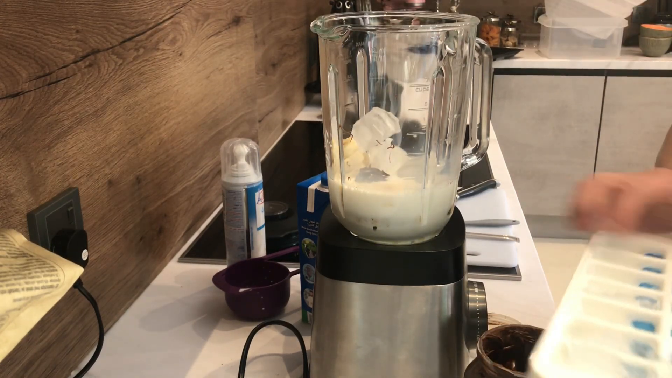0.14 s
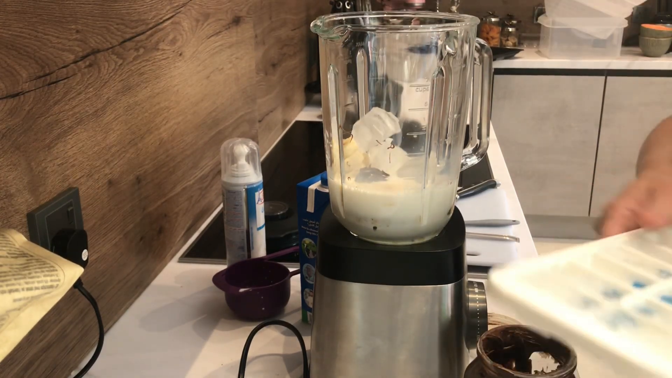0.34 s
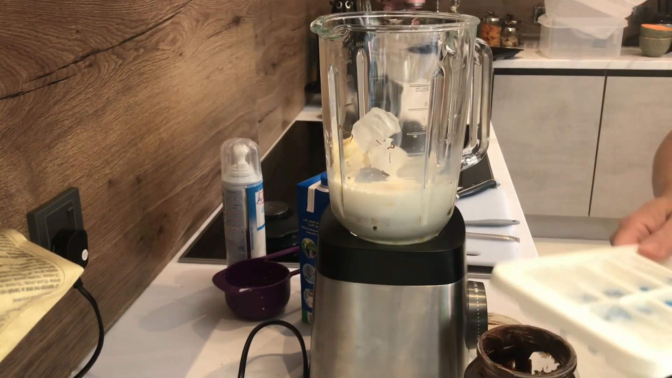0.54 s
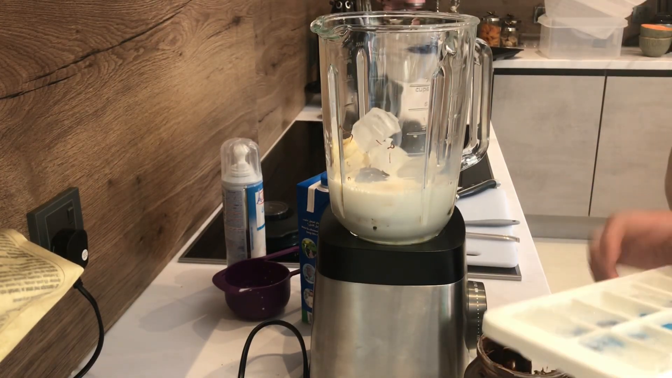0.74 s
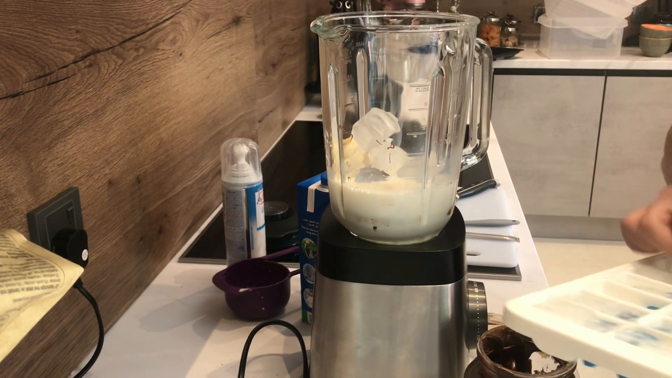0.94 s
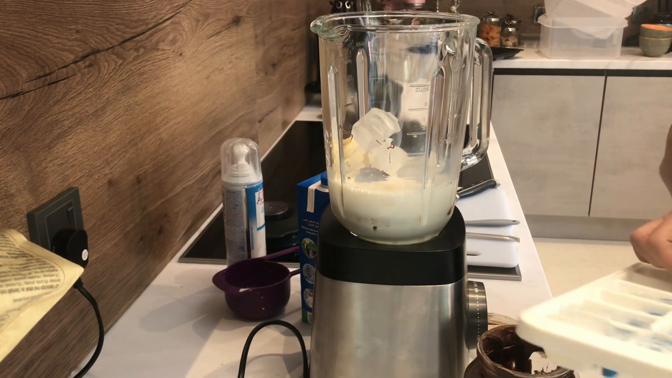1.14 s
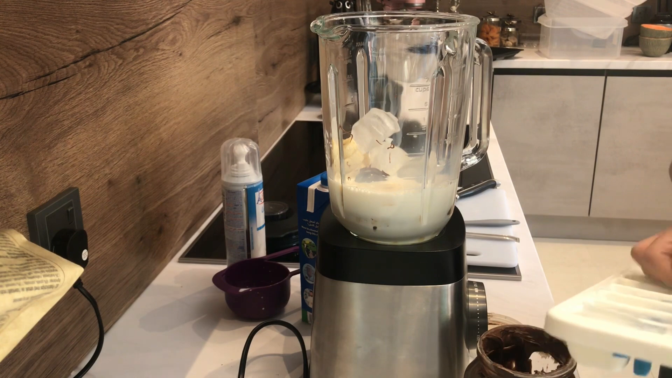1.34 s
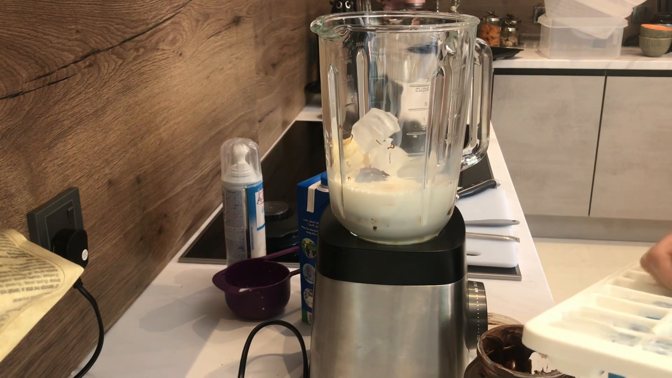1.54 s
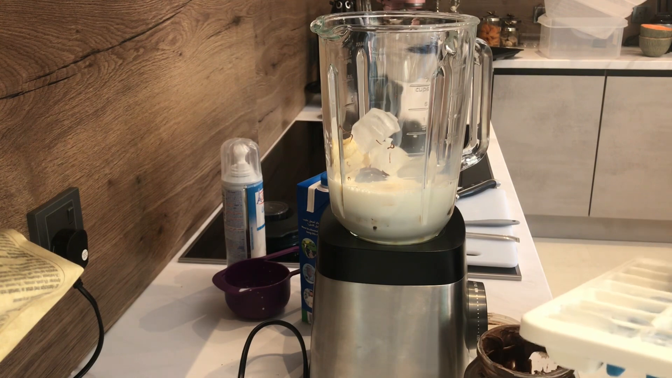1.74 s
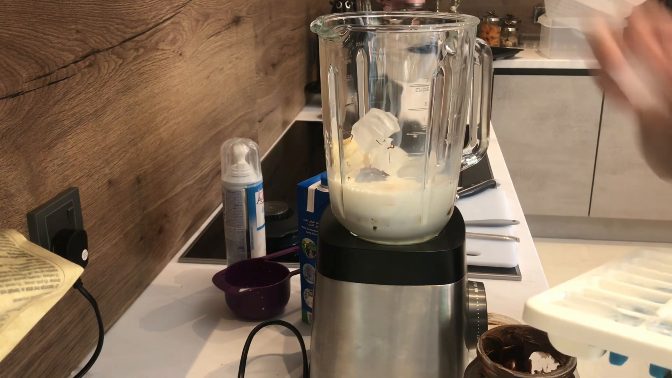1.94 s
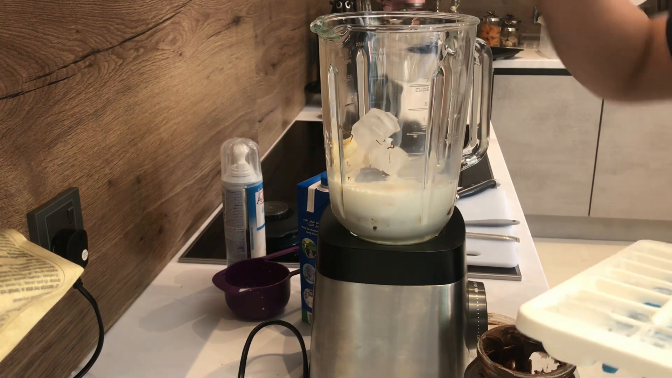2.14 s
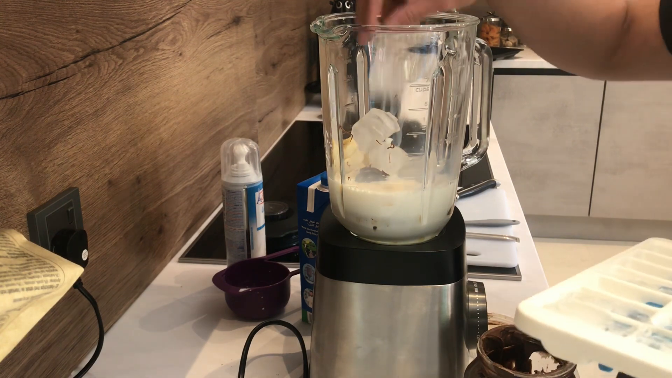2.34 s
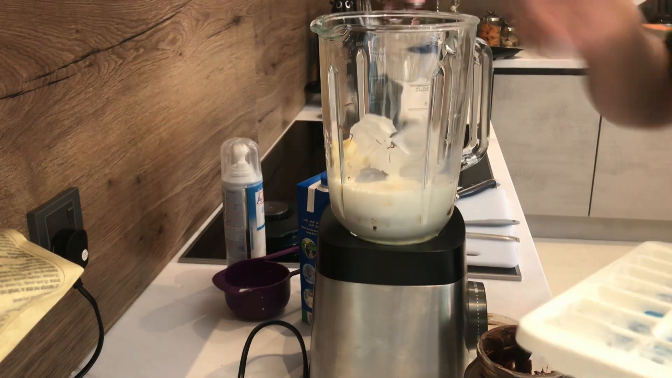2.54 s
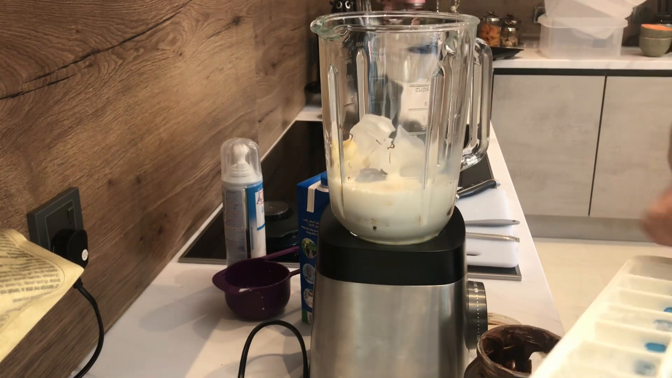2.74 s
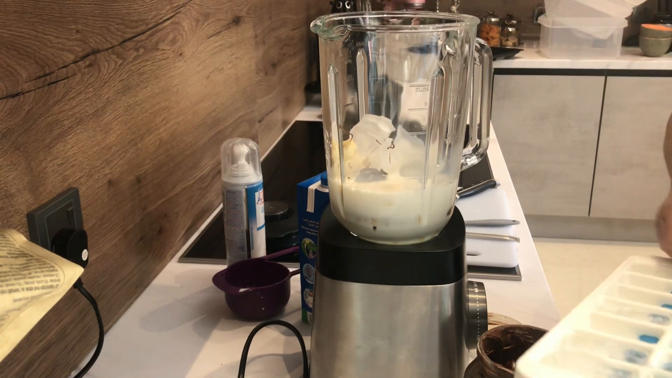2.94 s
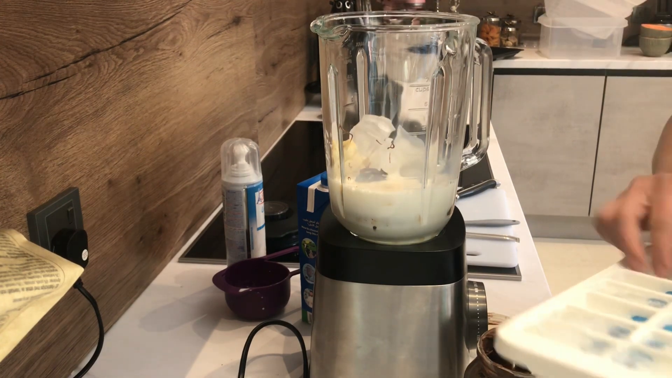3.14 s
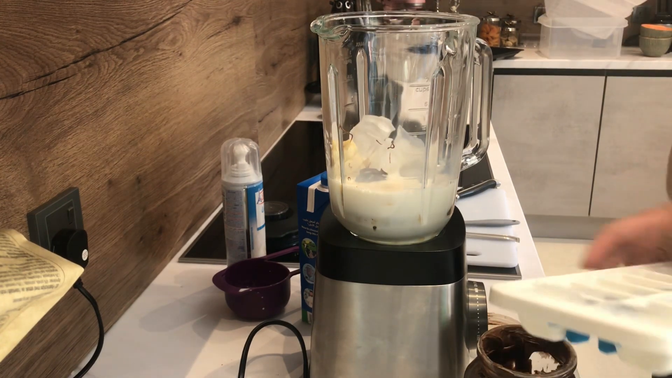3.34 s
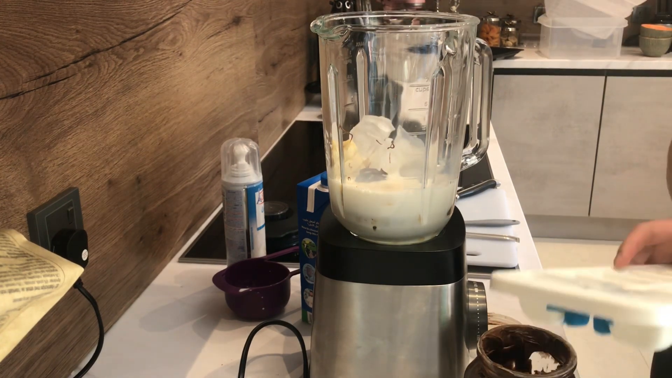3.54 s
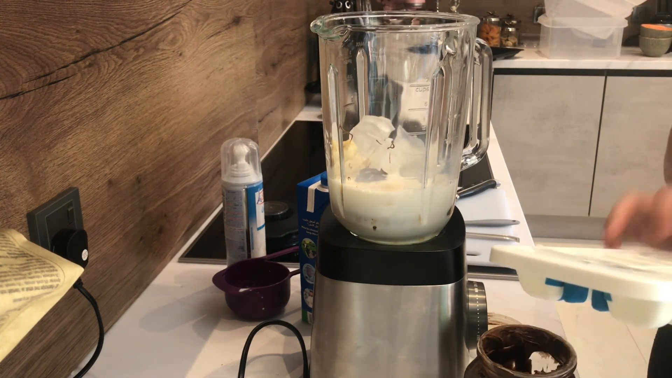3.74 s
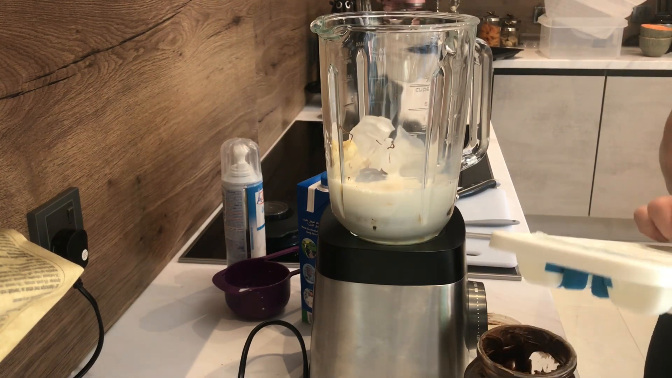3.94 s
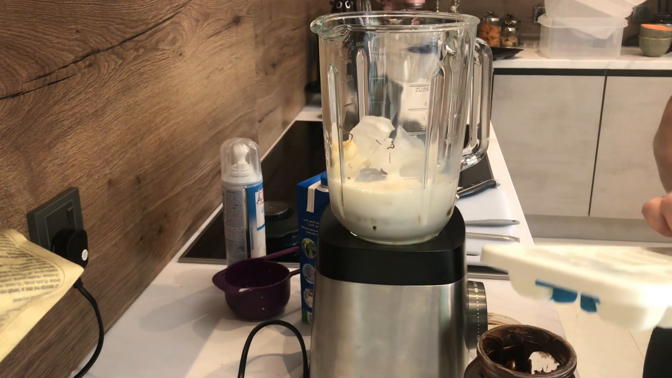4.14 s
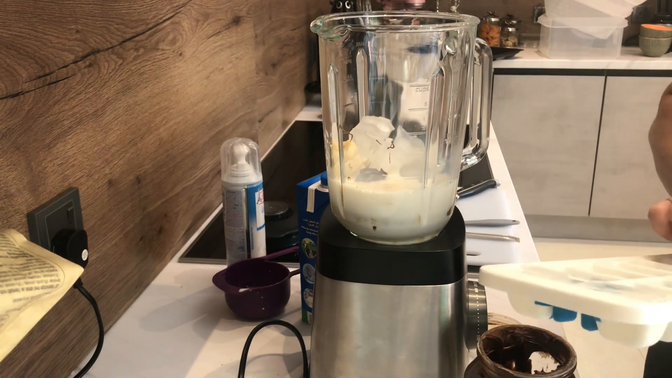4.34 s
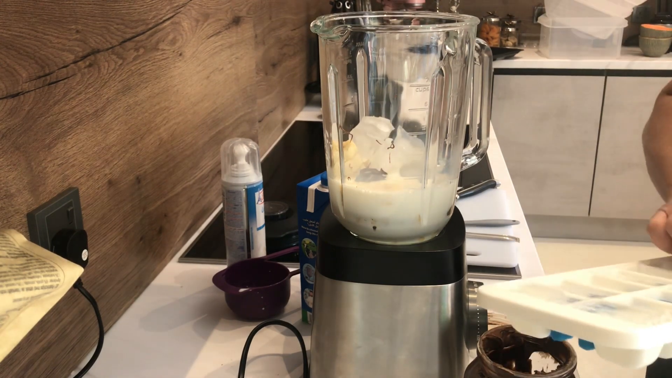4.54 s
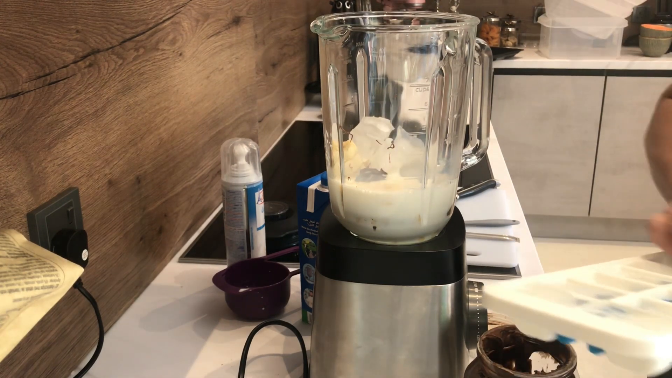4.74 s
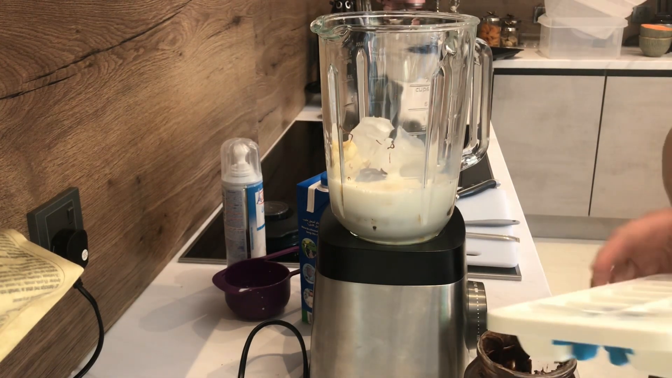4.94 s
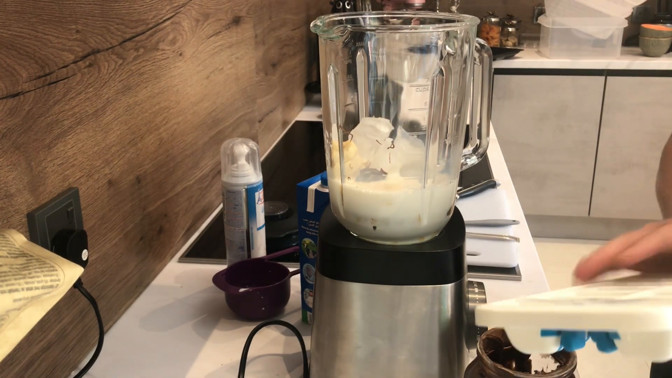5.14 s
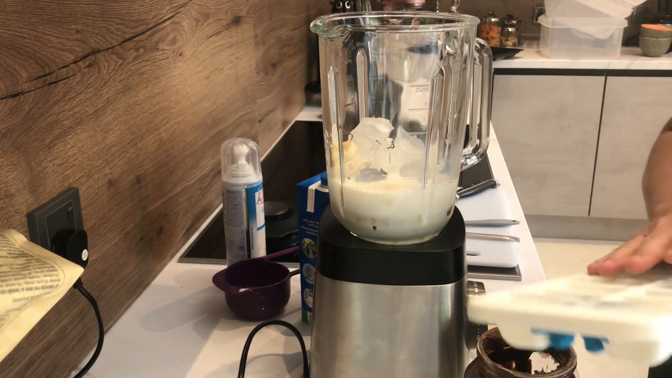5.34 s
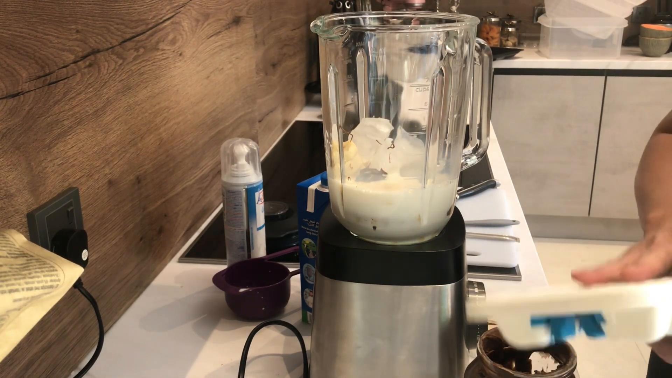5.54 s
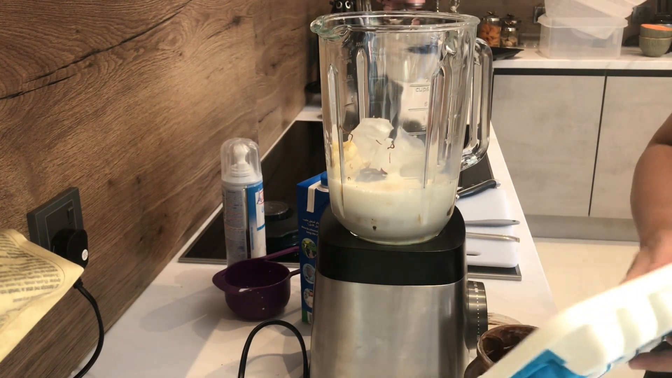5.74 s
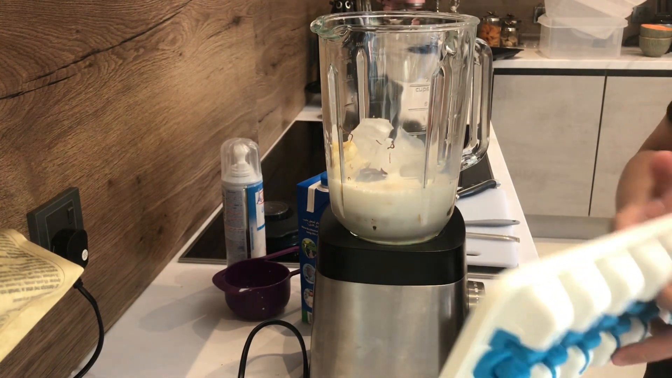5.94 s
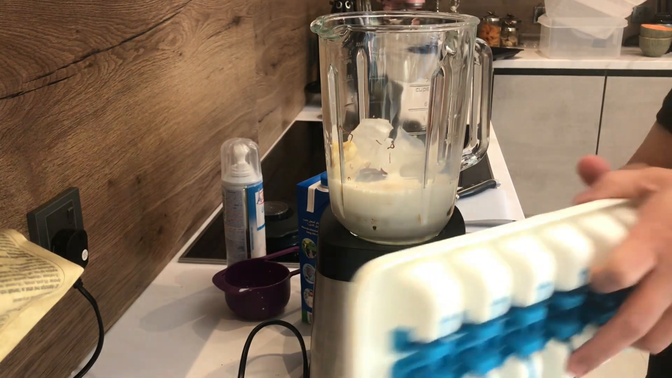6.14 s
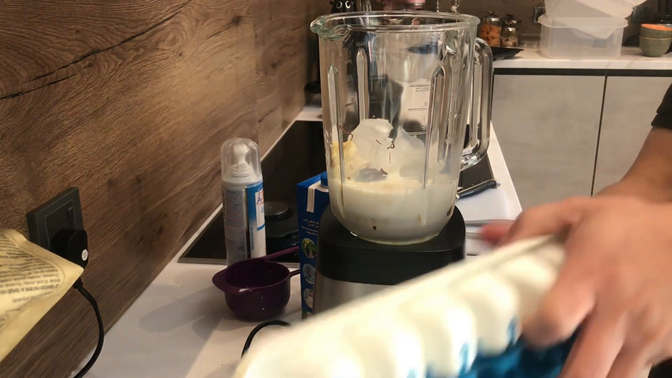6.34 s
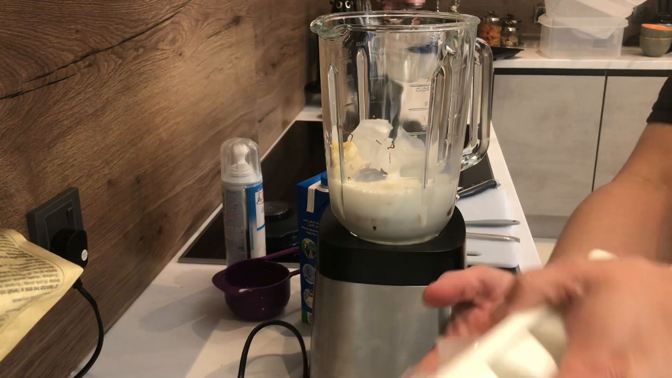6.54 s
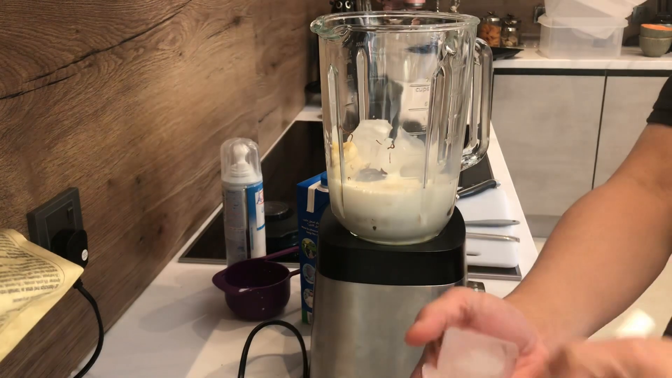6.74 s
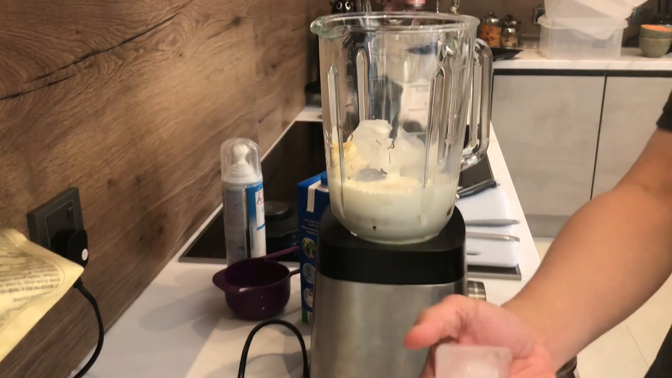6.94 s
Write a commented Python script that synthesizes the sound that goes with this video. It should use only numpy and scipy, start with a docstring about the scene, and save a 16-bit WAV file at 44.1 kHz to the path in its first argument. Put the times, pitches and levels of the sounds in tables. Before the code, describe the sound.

A close phone microphone catches brittle ice snapping in a plastic tray, with faint gritty finger rubs. After some quiet ticks, a few cubes rattle into a heavy glass jar, ringing briefly. More snaps follow, then a lull, then dense, hollow plastic cracks and dull gripping thumps, loudest at the end. A steady soft low hum and short echoes from hard kitchen surfaces lie behind.

```python
"""In a small kitchen, hands twist a plastic ice tray: noise bursts ring resonances of ice, cups and tray body.
Fingers rub the plastic, and later the tray rattles, in strokes of gritty filtered noise. From 2.3 s cubes drop
into a thick glass jar and bounce, ringing its decaying sine modes. Cracking resumes and grows loudest near the
end, with two low, dull thumps as the hand grips the tray. Shaped-noise appliance hum runs throughout; noise
echoes answer from hard walls."""
import sys
import numpy as np
from scipy import signal
from scipy.fft import rfft, irfft, next_fast_len
from scipy.io import wavfile
from scipy.ndimage import uniform_filter1d

SR = 44100
rng = np.random.default_rng(int(sys.argv[2]) if len(sys.argv) > 2 else 0)


def voltage_ratio(decibels):
    """Convert decibels (scalar or array-like) to amplitude ratios, 20 dB per decade."""
    exponent = np.asarray(decibels, float) / 20
    return 10 ** exponent


def unload_audio(sound):
    """Save the sound as a 16-bit wav file, at the path given as the first command line argument."""
    columns = np.transpose(np.atleast_2d(sound))
    # keep every value between -1 and 1, then stretch to whole-number steps
    steps = np.round(np.clip(columns, -1, 1) * 32767)
    wavfile.write(sys.argv[1], SR, steps.astype(np.int16))


N = 312751


def unit(x):
    """Scaled to rms 1."""
    return x / np.sqrt(np.mean(x ** 2) + 1e-20)


def tops(rows):
    """Each row scaled to peak 1."""
    return rows / (np.abs(rows).max(axis=-1, keepdims=True) + 1e-20)


def along(points, hz):
    """(f/Hz, value) points interpolated on a log frequency axis."""
    f, v = np.transpose(points)
    return np.interp(np.log(hz + 1), np.log(f + 1), v)


def filtered(x, response):
    """x filtered by a complex response of frequency."""
    m = next_fast_len(x.shape[-1] + 4096)
    return irfft(rfft(x, m) * response(np.fft.rfftfreq(m, 1 / SR)), m)[..., :x.shape[-1]]


def body(modes):
    """Causal response of resonances (f/Hz, width/Hz, level/dB), summed with alternating sign."""
    def response(f):
        total = 0
        for k, (centre_hz, width_hz, db) in enumerate(modes):
            damped = 1j * f * width_hz
            total = total + (-1) ** k * voltage_ratio(db) * damped / (centre_hz ** 2 - f * f + damped)
        return total
    return response


def rush(spectrum, patchy_db):
    """Coloured noise of rms 1 with time-frequency patches of random gain."""
    z = signal.stft(rng.standard_normal(N), nperseg=512)[2]
    field = uniform_filter1d(rng.standard_normal(z.shape), size=6, axis=0)
    field = uniform_filter1d(field, size=10, axis=1)
    noise = signal.istft(z * voltage_ratio(patchy_db * unit(field)), nperseg=512)[1][:N]
    return unit(filtered(noise, lambda hz: voltage_ratio(along(spectrum, hz))))


def placed(times, rows):
    """Each row of sound laid at its time."""
    at = np.round(times * SR).astype(int)[:, None] + np.arange(rows.shape[1])
    return np.bincount(at.ravel(), rows.ravel(), N + rows.shape[1] + 1)[:N]


def tray():
    """Every crack shakes the cups, and the whole tray as far as the grip allows."""
    # cracks and knocks of ice: t/s, level/dB, cube ring f/Hz, snap/dB
    cracks = [(0.0044, -26, 1200, -6), (0.0098, -25.5, 1900, -13), (0.026, -31, 5630, -1),
              (0.0379, -18.5, 1750, -14), (0.3069, -35, 4160, -8.5), (0.412, -34.5, 1850, -12),
              (0.462, -27, 2210, -33), (0.4685, -21, 2130, -17.5), (0.4786, -25.5, 2200, -28),
              (0.5623, -36, 1850, -9), (1.046, -19.5, 1920, -6.5), (1.2678, -36, 1790, -4),
              (1.2775, -39, 5870, 13), (1.289, -29, 5860, 2.5), (1.3067, -26, 1750, 1),
              (1.3131, -24.5, 1840, -7), (1.327, -21, 1710, -17), (1.4242, -31, 1960, 2),
              (1.4665, -39, 1900, 3), (1.495, -40, 5770, 1), (1.631, -42.5, 1770, -17),
              (1.654, -36.5, 1650, -5), (2.772, -20.5, 1655, -30), (2.7797, -19, 1530, -13),
              (2.7947, -18, 1760, -11), (2.841, -19.5, 1790, -34), (2.9383, -32, 3860, -13),
              (2.9441, -29.5, 2050, -6), (3.0744, -9, 6400, -23), (3.1075, -14, 3800, -5.5),
              (3.1294, -13, 5070, -23), (3.1342, -21, 5340, -3), (3.1754, -17, 2650, -15),
              (3.1932, -15.5, 2700, -15), (3.2049, -27, 1820, -9), (3.2427, -21, 1900, -2.5),
              (3.2473, -11.5, 4930, -11), (3.33, -21.5, 5650, -10.5), (3.337, -29.5, 3900, -9.5),
              (3.3698, -25.5, 6000, -20), (3.377, -28.5, 5110, -4), (3.9126, -28, 2690, -9),
              (3.9224, -28, 1710, -3), (4.004, -40.5, 2930, -7.5), (4.043, -37, 1720, 0),
              (4.056, -32, 1720, 1), (4.2563, -19.5, 1700, -4.5), (4.3129, -28.5, 1800, -8),
              (4.352, -21, 1800, -4), (4.4423, -48.5, 1670, 11), (4.4805, -28, 1730, -16.5),
              (4.5721, -25, 1690, -13), (4.5925, -40, 1810, -7), (4.6304, -38, 1840, -10),
              (5.3445, -36, 1830, -12), (5.382, -42, 1570, 0.5), (5.6542, -36, 5560, 5),
              (5.7412, -39, 4300, -7), (5.8132, -27.5, 1930, -29), (5.825, -29, 1900, -21),
              (5.8508, -23.5, 4190, -11.5), (5.905, -22, 1980, -20), (5.9134, -22, 1920, -28),
              (5.924, -26, 3470, -10), (5.9996, -36, 5430, 1.5), (6.0288, -25, 2000, -4.5),
              (6.1, -21.5, 1930, -15), (6.1223, -16, 6100, -6), (6.1423, -15.5, 1520, -13),
              (6.1538, -20, 1380, -5), (6.188, -13.5, 1360, -6), (6.2232, -34, 1660, 10),
              (6.2404, -33, 8400, 9.5), (6.2752, -11, 7000, -7), (6.2909, -12, 8540, 1),
              (6.3571, -17, 3800, 1), (6.396, -28, 3860, -9), (6.4083, -25, 5590, 2.5),
              (6.4646, -19.5, 2210, -1), (6.5119, -20, 2200, 4.5), (6.597, -19.5, 3900, -7),
              (6.6242, -34.5, 7100, 2), (6.6367, -12, 3480, -0.5), (6.6743, -6.5, 1870, -22),
              (6.6953, -9, 1490, -6), (6.7219, -8.5, 1580, -16), (6.829, 0.5, 1150, -9),
              (6.854, -18, 1200, -25), (6.879, -23.5, 1300, -30.5), (6.929, -7, 3800, -11.5),
              (6.9538, -8, 1050, -30), (6.9979, -31, 2190, -3), (7.005, -12, 2130, -12),
              (7.0805, -21.5, 2260, -4)]
    # low body of the tray: f/Hz, width/Hz, level/dB
    tray_modes = [(204, 250, -13), (442, 210, -8), (645, 140, -4.5), (992, 148, 2.5), (1300, 88, 3.5)]
    # cups: f/Hz, width/Hz, level/dB
    cup_modes = [(1750, 245, 3), (2920, 1750, 1.5), (3384, 665, 7), (4940, 3350, -2), (5840, 1130, 3)]
    # how freely the hands let the body thud; gripped, then turned over: t/s, level under the crack/dB
    slack = [(0, -18), (0.5, -19), (1.4, -9), (2.7, -19.5), (3.4, -22), (3.9, -18), (4.7, -11),
             (5.8, -20.5), (6.05, -19), (6.12, -9.5), (6.36, -7), (6.62, -16), (6.8, -12), (7.09, 1)]
    thud_db_per_octave = -1.5  # high, small cracks move the tray less
    thud_scatter_db, flex_octaves = 1.5, 0.1  # standard deviations

    s, db, hz, snap_db = crackle(np.array(cracks), count=5).T
    chance = rng.standard_normal((len(s), 2))
    thud_db = np.interp(s, *np.transpose(slack)) + thud_db_per_octave * np.log2(hz / 2000)
    thud_db = thud_db + thud_scatter_db * chance[:, 0]
    flex = 2 ** (flex_octaves * chance[:, 1:])  # bending shifts the body's pitch from crack to crack
    push, crack = ice(s, db, hz, snap_db, burst_s=0.026, width_hz=270)
    cups = voltage_ratio(-3.5) * tops(filtered(push, body(cup_modes)))
    shaken = filtered(push, lambda f: body(tray_modes)(f / flex + 1e-3) / (1 + 1j * f / 1500))
    thud = voltage_ratio(thud_db)[:, None] * tops(shaken)
    return placed(s, crack + voltage_ratio(db)[:, None] * (cups + thud))


def crackle(cracks, count):
    """Strained ice ticks: once just before each crack, and a few fainter, brighter times after it."""
    after = np.repeat(cracks, count, axis=0)
    chance = rng.random((len(after), 3))
    delay_s = -0.05 * np.log(1 - chance[:, 0])
    after[:, 0] = np.minimum(after[:, 0] + 0.006 + delay_s, N / SR)
    after[:, 1] -= 14 + 10 * chance[:, 1] + 90 * delay_s
    after[:, 2] *= 2 ** (chance[:, 2] - 0.5)
    after[:, 3] += 3

    lead = cracks.copy()
    lead[:, 0] -= 0.003 + 0.008 * rng.random(len(lead))
    lead[:, 1] += -32 + 12 * rng.random(len(lead))
    lead[:, 3] += 6
    return np.vstack([cracks, after, lead[lead[:, 0] > 0]])


def ice(times, db, hz, snap_db, burst_s, width_hz):
    """A break in ice is one sharp slip and a spray of smaller ones: a bright snap, the cube's ring, and a push."""
    t = np.arange(2048) / SR
    spray = voltage_ratio(-11.5 - 60 * t / burst_s) * (1 - np.exp(-t / 0.0006))

    def slips(first_db):
        first = voltage_ratio(first_db - 60 * t / 0.0012)
        return rng.standard_normal((len(times), len(t))) * (spray + first)

    push = slips(first_db=0.5)
    snap = tops(filtered(slips(first_db=-3.5), body([(7400, 6600, -0.56), (13800, 5600, -1.5)])))
    cube = tops(filtered(push, body([(hz[:, None], width_hz, 0)])))
    return push, voltage_ratio(db)[:, None] * (voltage_ratio(snap_db)[:, None] * snap + voltage_ratio(-6.5) * cube)


def jar():
    """Each cube strike knocks, and rings the glass; its split lowest pair beats."""
    # cubes striking the jar: t/s, level/dB, cube ring f/Hz, low bell/dB, upper glass/dB
    clinks = [(2.3237, -19.5, 13800, -12, -13.5), (2.363, -22, 13800, -35, -23),
              (2.3861, -11, 8400, -5, -2), (2.4184, -17.5, 2270, -5, -36.5), (2.472, -15.5, 4600, -12, -6),
              (2.5017, -21, 7700, -5, -7), (2.537, -34.5, 7650, 2, 0), (2.589, -31.5, 13900, 4, -6),
              (2.606, -26, 2370, -13, -30), (2.62, -31.5, 2500, -36, -8)]
    # glass modes: f/Hz, level/dB, t60/s
    glass_modes = [(1135, -3, .4), (1186, 0, .45), (1585, -12, .12), (1672, -12, .1), (2465, -25, .45),
                   (2735, -28, .45), (2960, 0, .035), (3031, -24, .4), (3343, -28, .5), (3820, -27, .4),
                   (4457, 1, .05), (4716, -16, .2), (4955, -8, .09), (5150, -24, .5), (6072, -17, .2),
                   (9550, -1, .035), (11670, -23, .1), (15550, -13, .08)]
    # cubes come to rest and damp the lowest pair: t/s, damping/(dB/s)
    settle_s, settle_db_per_s = (2.62, 200)
    first_snap_db, dulls_db_per_s = -26, 57  # lower bounces are duller

    s, db, hz, bell_db, upper_db = np.transpose(clinks)
    snap_db = first_snap_db - dulls_db_per_s * (s - s[0])
    push, crack = ice(s, db, hz, snap_db, burst_s=0.06, width_hz=250)
    knock_modes = [(400, 140, -7), (1900, 1000, 0), (3050, 500, 6), (4770, 1500, -2.5)]
    knock = voltage_ratio(db + 3.0)[:, None] * tops(filtered(push, body(knock_modes)))

    t = np.arange(SR // 2) / SR
    f, level_db, t60_s = np.transpose(glass_modes)
    low = f < 1300
    decay = voltage_ratio(-60 * t / t60_s[:, None]) * (1 - np.exp(-t / 0.0012))
    modes = np.sin(2 * np.pi * f[:, None] * t) * decay
    spot_db = 2 * rng.standard_normal((len(s), len(f)))  # where the cube lands
    strength_db = db[:, None] + level_db + np.where(low, bell_db[:, None], upper_db[:, None] + spot_db)
    strength_db = strength_db + 0.5 * db[:, None] * (f > 9000)  # weak blows hardly reach the highest modes
    bell = placed(s, voltage_ratio(strength_db[:, low]) @ modes[low])
    upper = placed(s, voltage_ratio(strength_db[:, ~low]) @ modes[~low])
    damping = voltage_ratio(-settle_db_per_s * np.clip(np.arange(N) / SR - settle_s, 0, None))
    return placed(s, crack + knock), damping * bell, upper


def fingers():
    """Skin sticks and slips on plastic and wet ice: gritty hiss with a rasp that swells and fades; from about
    6.1 s the strokes are the tray rattling in the hands."""
    # hiss colour: f/Hz, level/(dB per Hz)
    skin_colour = [(700, -48), (1500, 9), (3000, 4.5), (5000, 7.5), (7000, 2), (8500, 8), (10500, -1),
                   (15500, 3), (16600, -48)]
    # strokes: start t/s, length/s, level/dB, rasp f/Hz
    strokes = [(0.29, 0.094, -55.5, 4400), (0.593, 0.081, -40.5, 3800), (0.883, 0.16, -66, 3970),
               (1.324, 0.41, -65, 1900), (2.798, 0.19, -55.5, 3120), (3.228, 0.11, -51.5, 4000),
               (3.636, 0.04, -48.5, 3640), (4.33, 0.079, -54.5, 3940), (4.89, 0.3, -67.5, 4100),
               (5.188, 0.26, -62.5, 3420), (5.495, 0.46, -64.5, 3850), (5.906, 0.048, -44, 3030),
               (5.974, 0.14, -57.5, 4200), (6.077, 0.3, -50.5, 1330), (6.29, 0.19, -53, 3100),
               (6.38, 0.13, -64, 3140), (6.654, 0.039, -43, 3800), (6.727, 0.16, -70, 1700),
               (6.82, 0.13, -40.5, 2500), (6.945, 0.17, -45.5, 1150)]

    grit = voltage_ratio(4.5 * unit(uniform_filter1d(rng.standard_normal(N), size=90)))
    hiss = unit(grit * rush(skin_colour, patchy_db=1.5))
    out = np.zeros(N)
    for s, length_s, db, hz in strokes:
        start = round(s * SR)
        part = hiss[start:][:round(length_s * SR)]
        u = np.linspace(0, 1, len(part))
        rasp = 0.96 * part + unit(filtered(part, body([(hz, 0.4 * hz, 0)])))
        out[start:][:len(part)] += voltage_ratio(db) * np.sin(np.pi * u ** 0.8) * rasp
    return out


def grip():
    """Two low, dull thumps as the hand grips the tray: a push with little ring."""
    # thumps: t/s, peak level/dB
    thumps = [(6.278, -35.5), (6.83, -20.5)]
    s, db = np.transpose(thumps)
    t = np.arange(8192) / SR
    push = np.exp(-t / 0.00094) + 0.31 * rng.standard_normal((len(s), len(t))) * voltage_ratio(-60 * t / 0.18)
    thump = tops(filtered(push, body([(73, 11, 10.5), (152, 48, 7.5), (322, 270, -6.5)])))
    return placed(s, voltage_ratio(db)[:, None] * thump)


def kitchen(x):
    """The walls' answer, drawn anew for each short stretch; each frequency dies at its own speed."""
    # wall reverberation: f/Hz, t60/s
    wall_t60 = [(150, 0.6), (1000, 1), (4000, 0.61), (9000, 0.43), (16000, 0.17)]
    step, delay = 8192, 130  # samples
    out = np.zeros(N + SR)
    for a in range(0, N, step):
        hz, t, z = signal.stft(rng.standard_normal(SR // 2), SR, nperseg=256)
        decay = voltage_ratio(-60 * t / along(wall_t60, hz)[:, None])
        tail = signal.istft(z * decay, SR, nperseg=256)[1][:SR // 2]
        wet = signal.fftconvolve(x[a:a + step], tail / np.linalg.norm(tail))
        out[a + delay:][:len(wet)] += wet
    return out[:N]


def hum():
    """Appliance hum: noise weighted to the lows, mostly steady, swelling quickly near 5.3 s, sunk back by 6 s."""
    # colour: f/Hz, level/(dB per Hz)
    hum_colour = [(13, -46), (22, -34.5), (43, -1), (85, -2), (166, -10), (274, -8.5), (381, -13.5),
                  (594, -7.5), (806, -13.5), (1400, -15.5), (1700, -21.5), (6990, -44), (7600, -50),
                  (14400, -43.5), (16500, -66)]
    # loudness: t/s, rms level/dB
    hum_level = [(0.0, -52.5), (2.02, -52.5), (2.39, -50), (5.15, -52), (5.3, -47.5), (6.0, -53)]
    s, db = np.transpose(hum_level)
    return voltage_ratio(np.interp(np.arange(N) / SR, s, db)) * rush(hum_colour, patchy_db=0.5)


def scene():
    """Tray, jar, fingers and grip in the room, over the hum; the jar stands nearest and rings driest."""
    knocks, bell, upper = jar()
    near = tray() + knocks + fingers() + grip()
    send = near + voltage_ratio(-18) * bell + voltage_ratio(-4) * upper
    return (near + bell + upper + voltage_ratio(-12) * kitchen(send) + hum())[None]


def band_limit(x):
    """A steep low-pass at the top of the band."""
    return signal.sosfilt(signal.butter(12, 17150, fs=SR, output="sos"), x)


def record(dry):
    """A phone microphone adds its own faint hiss, saturates on the loudest peak and cuts the top treble."""
    hiss_colour = [(4000, -5.5), (9000, -10.5), (15800, -13), (16600, -25)]  # f/Hz, level/(dB per Hz)
    sound = dry + voltage_ratio(-71) * rush(hiss_colour, patchy_db=1)
    rounded = sound / (1 + np.abs(sound / 0.95) ** 6) ** (1 / 6)
    heard = filtered(rounded, lambda hz: hz < 16900)
    return band_limit(heard)


dry = scene()
out = record(dry)
unload_audio(out)
```